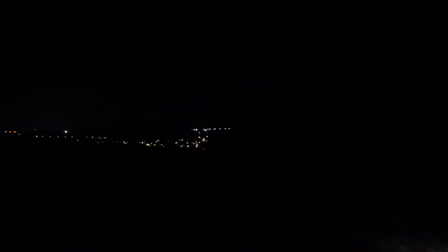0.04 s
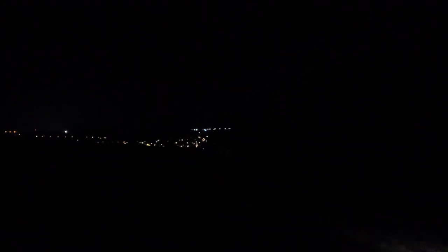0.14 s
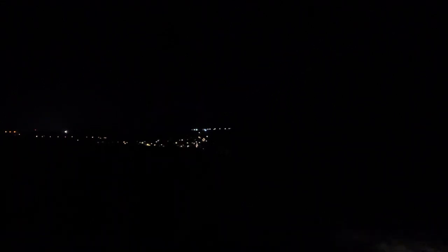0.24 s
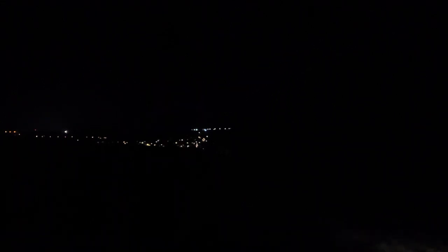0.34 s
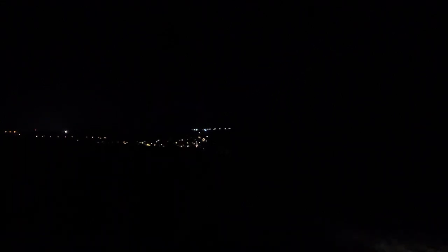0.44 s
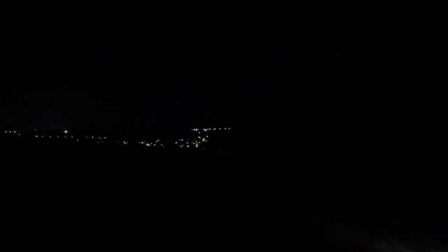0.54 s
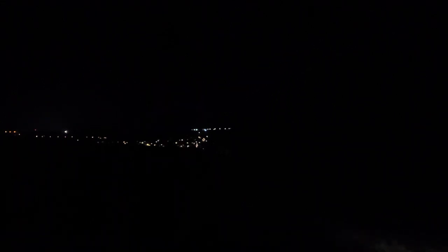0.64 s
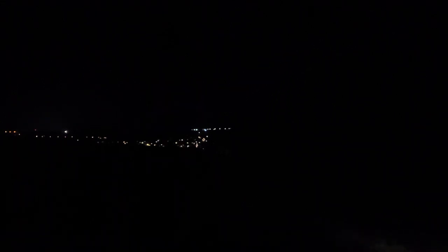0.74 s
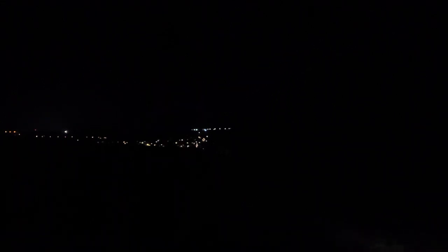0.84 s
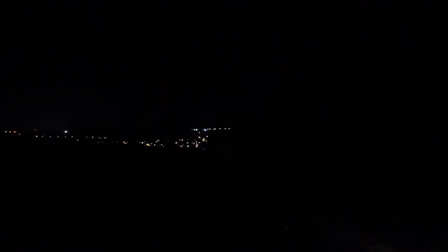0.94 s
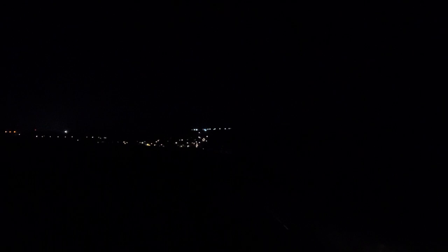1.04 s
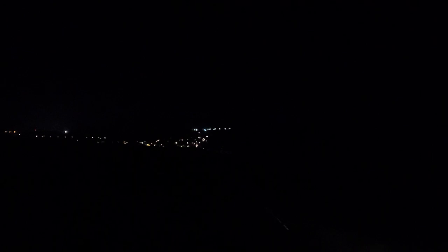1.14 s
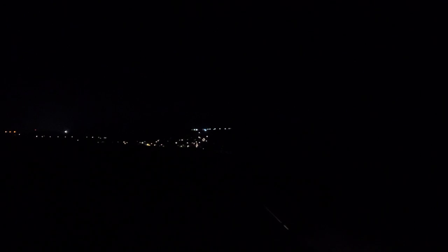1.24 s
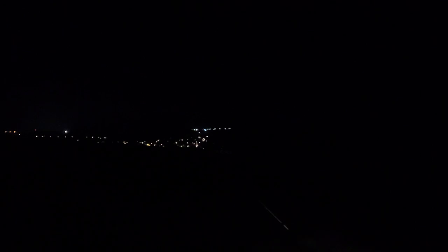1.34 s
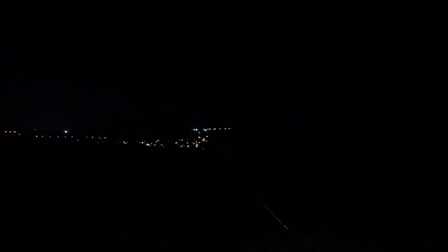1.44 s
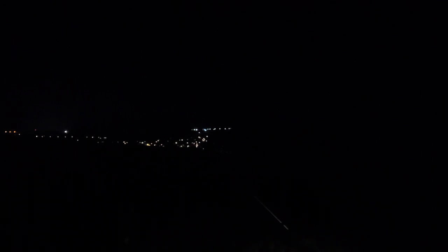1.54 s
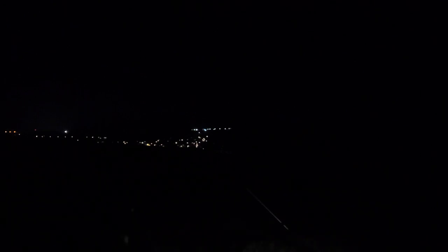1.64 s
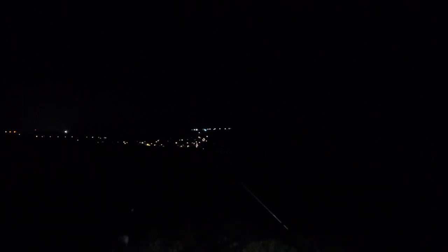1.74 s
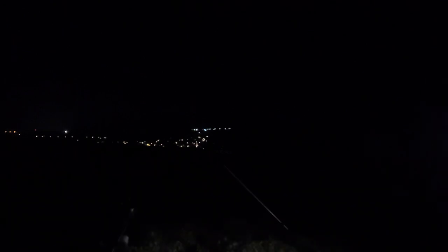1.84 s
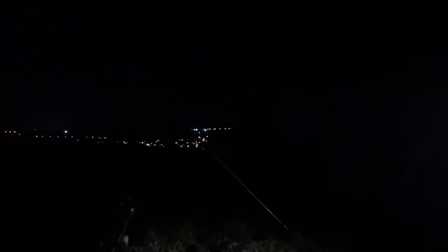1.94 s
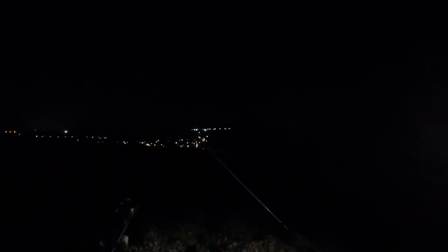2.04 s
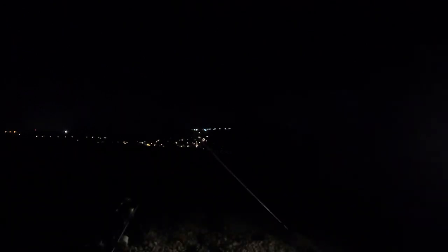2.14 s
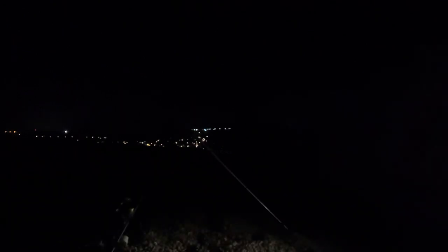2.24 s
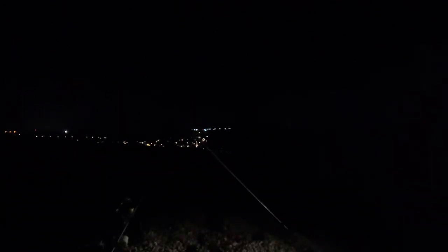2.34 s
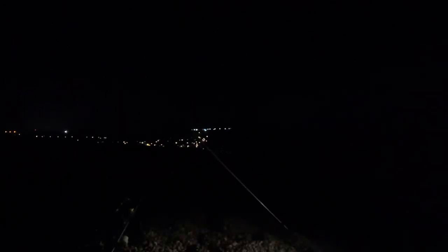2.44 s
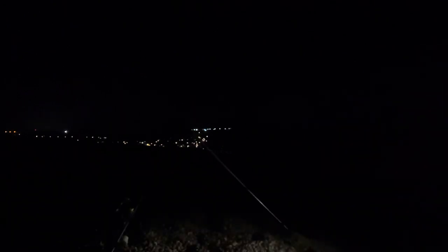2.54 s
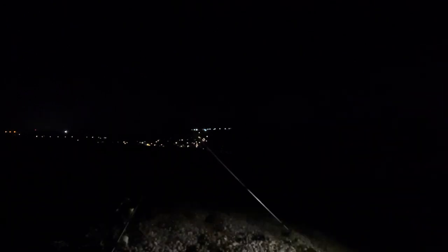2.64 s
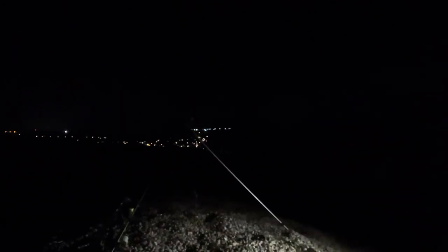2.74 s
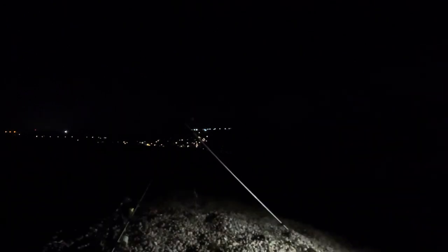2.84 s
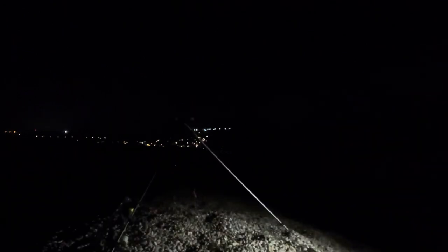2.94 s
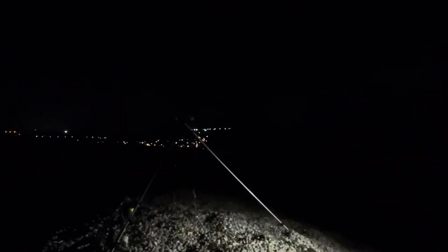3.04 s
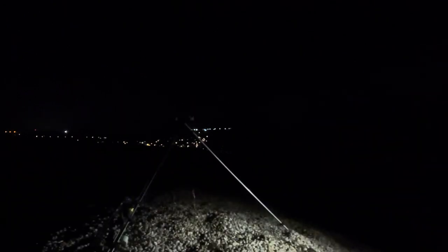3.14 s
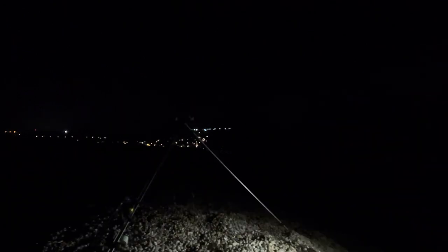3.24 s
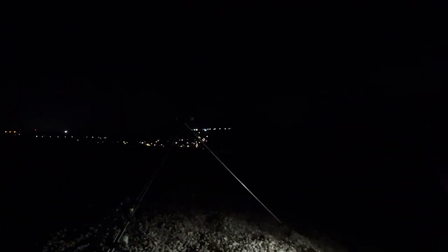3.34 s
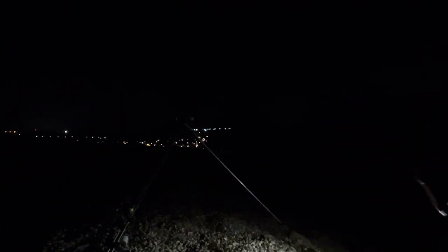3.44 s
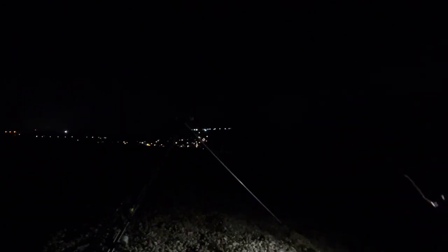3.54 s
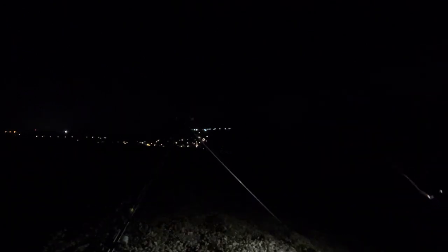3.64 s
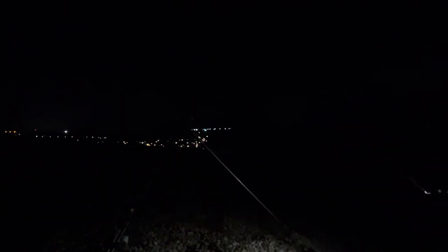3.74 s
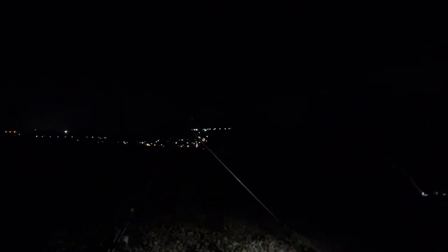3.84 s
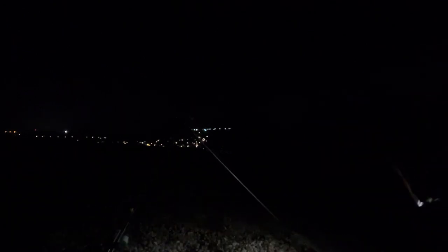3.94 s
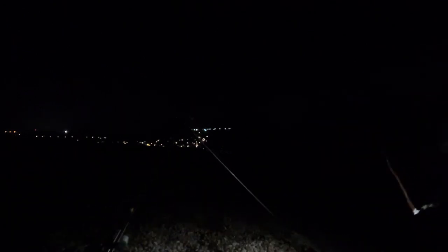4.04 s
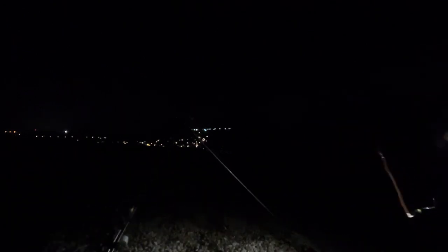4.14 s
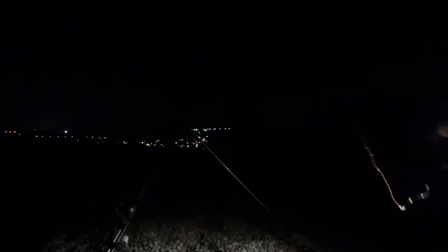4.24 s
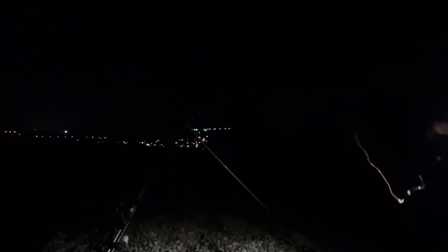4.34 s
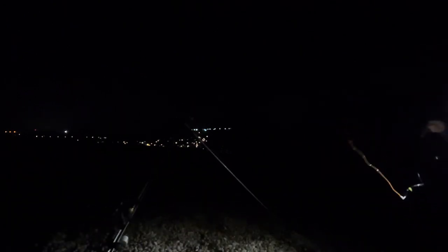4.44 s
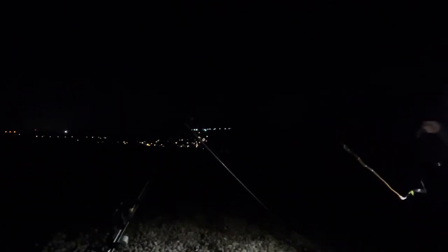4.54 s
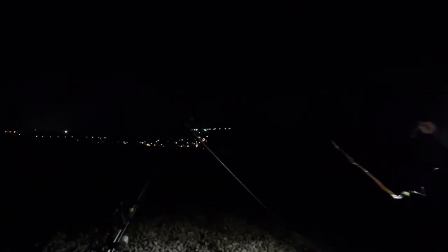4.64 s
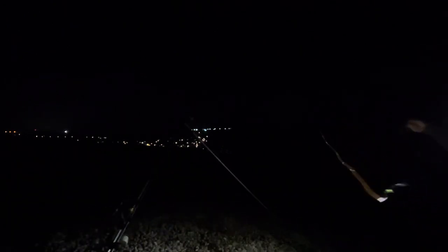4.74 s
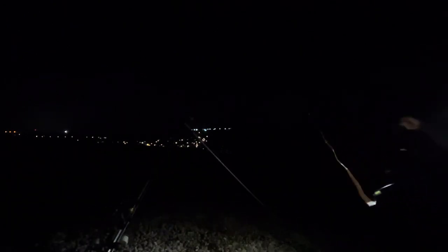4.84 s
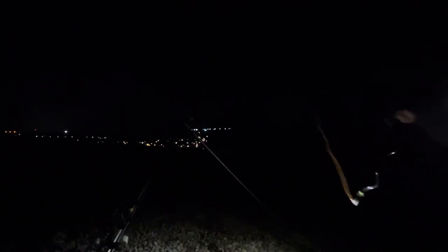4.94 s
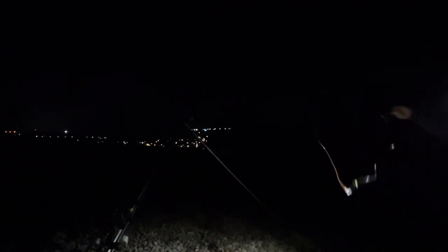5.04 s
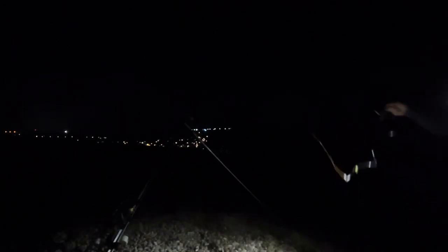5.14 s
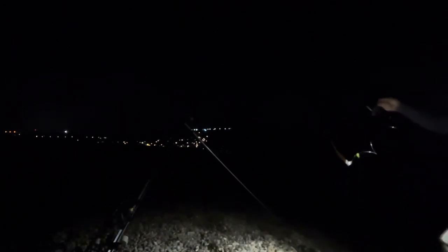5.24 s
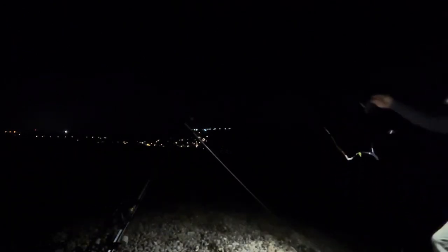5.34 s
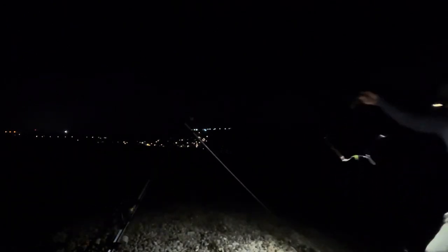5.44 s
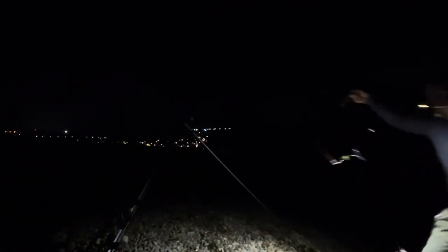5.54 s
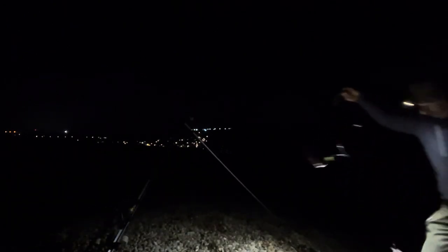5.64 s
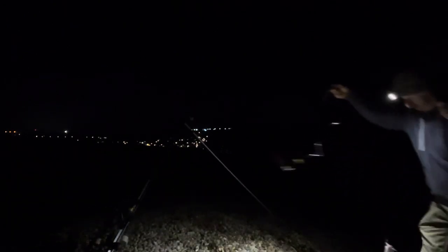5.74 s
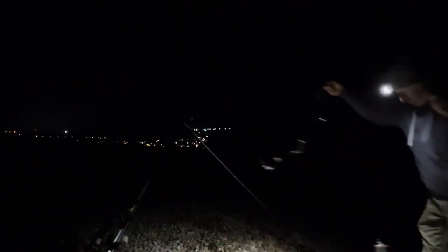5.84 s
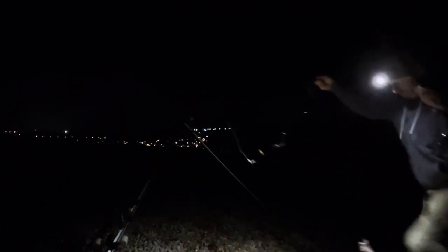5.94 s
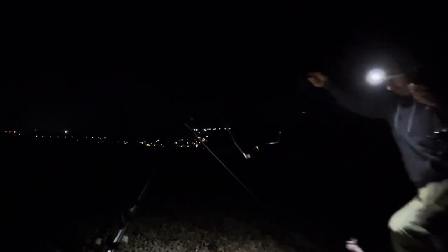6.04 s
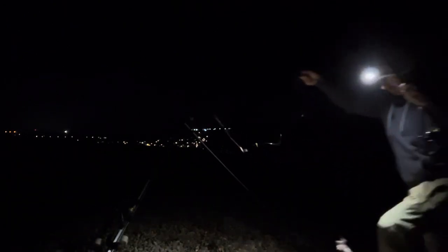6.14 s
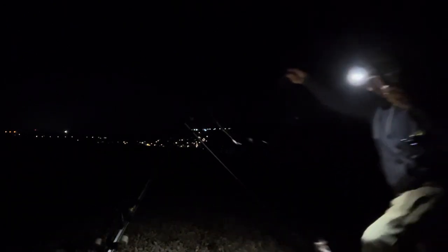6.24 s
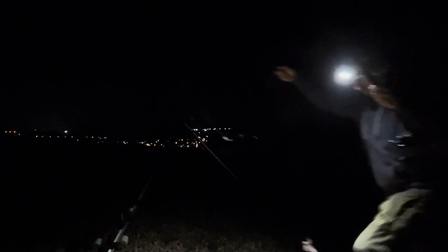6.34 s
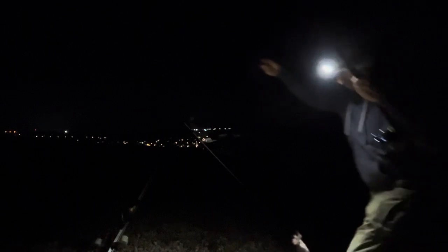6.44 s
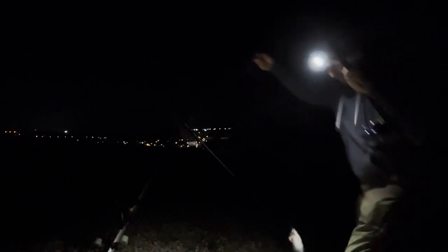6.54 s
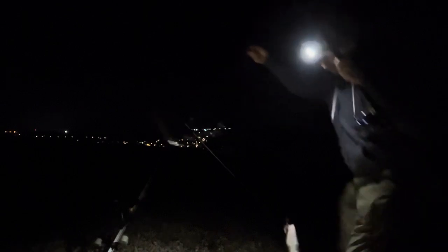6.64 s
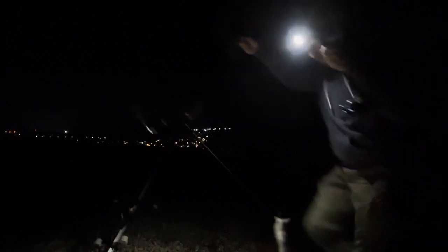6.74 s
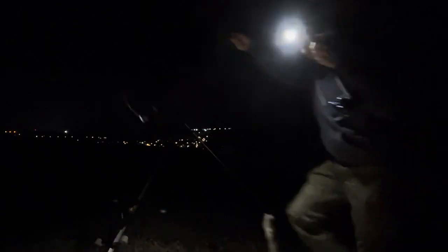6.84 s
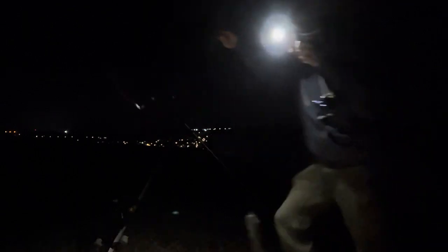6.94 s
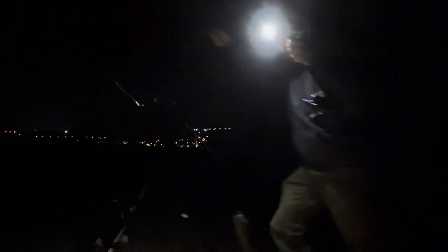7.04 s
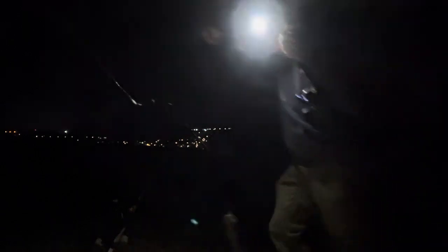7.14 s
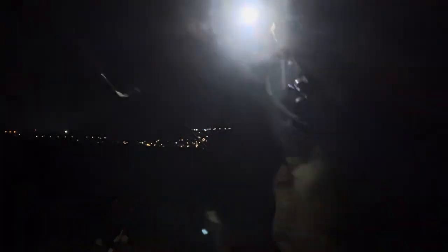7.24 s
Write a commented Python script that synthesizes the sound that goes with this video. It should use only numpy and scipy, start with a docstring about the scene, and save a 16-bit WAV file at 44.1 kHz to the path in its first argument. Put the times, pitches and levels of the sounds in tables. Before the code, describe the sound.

Someone walks over a shingle beach towards a stationary microphone, from the right. Each step is a gritty crunch of many small stones, with a heel bite, rolling weight and dragging scrape, and stray pebbles ticking between. Steps start soft and distant, about one every three quarters of a second, and steadily grow louder, ending with sharp stone cracks close by. The sea is barely audible behind, with a faint low engine hum.

```python
"""A shingle beach, with someone walking up it towards the microphone from the right.
Each step is a grind of thousands of tiny stone contacts in three sizes, its level shaped by heel, sole and drag.
Single stones click as short decaying rings with noise, some squeak as falling chirps, and the boot's
weight thuds as damped low sines. Filtered noise makes a faint wash of sea; a wavering sine is a far engine."""
import sys
import numpy as np
from scipy import signal
from scipy.fft import rfft, irfft, next_fast_len
from scipy.io import wavfile
from scipy.ndimage import uniform_filter1d, map_coordinates

SR = 44100
rng = np.random.default_rng(int(sys.argv[2]) if len(sys.argv) > 2 else 0)


def dump(signal):
    """Clip the signal to [-1, 1] and save it as 16-bit WAV at the path in sys.argv[1]."""
    limited = np.clip(np.atleast_2d(signal).T, -1, 1)
    pcm = np.round(limited * 32767).astype(np.int16)
    wavfile.write(sys.argv[1], SR, pcm)


N = 321209
TIME = np.arange(N) / SR
REFERENCE_DB = -40  # crunch level at which densities and layer levels are set


def gain_of(db):
    """Turns decibels into amplitude."""
    return 10 ** (np.asarray(db) / 20)


def evened(x):
    """Scales a signal to rms 1."""
    return x / np.sqrt(np.mean(x ** 2) + 1e-20)


def follow(rows, column=1):
    """Draws one table column as a curve over every sample."""
    rows = np.asarray(rows)
    return np.interp(TIME, rows[:, 0], rows[:, column])


def add(mix, start_s, sound):
    """Mixes a two-channel sound in at its start time."""
    part = mix[:, max(round(start_s * SR), 0):][:, :sound.shape[1]]
    part += sound[:, :part.shape[1]]


def colour(x, points, size=2048):
    """Minimum-phase filter through (hz, db) points: no pre-ringing, so attacks stay sharp."""
    hz, db = np.transpose(points)
    bins_hz = abs(np.fft.fftfreq(size, 1 / SR))
    curve_db = np.interp(np.log(bins_hz + 1), np.log(hz), db)
    log_gain = np.log(gain_of(curve_db))
    taps = np.fft.ifft(np.exp(np.conj(signal.hilbert(log_gain)))).real[:size // 2]
    return signal.oaconvolve(x, taps[None], axes=1)[:, :x.shape[1]]


def wander(rate_hz, size=N):
    """Smooth random movement of rms 1: white noise rolled off steeply above rate_hz."""
    length = next_fast_len(size)
    hz = np.fft.rfftfreq(length, 1 / SR)
    spectrum = rfft(rng.standard_normal(length)) / (1 + (hz / rate_hz) ** 2) ** 2
    return evened(irfft(spectrum, length)[:size])


# spectrum of the sea's wash: hz, gain_db
SEA_COLOUR = [(20, -37), (45, 7), (70, 4), (100, -8), (250, -15), (600, -18.5), (1500, -12.5),
              (2500, -16.5), (4000, -17.5), (6000, -17), (10000, -41), (16000, -59)]


def sea():
    """Wash of the sea: coloured noise, partly shared by the two channels, swelling slowly."""
    shared, *own = rng.standard_normal((3, N))
    wash = evened(colour(shared + np.array(own), SEA_COLOUR))
    return wash * gain_of(-62.5 + 1.8 * wander(3))


# the far engine's tone: pitch_hz, level_db (rms)
ENGINE_TONE = [(59.2, -59)]


def engine_drone():
    """Far engine: one low tone whose strength and phase waver at random."""
    pitch_hz, level_db = ENGINE_TONE[0]
    waver = 1 + .5 * wander(35) + .5j * wander(34)
    tone = (waver * np.exp(2j * np.pi * pitch_hz * TIME)).real
    return evened(tone) * gain_of(level_db)


STRIKE_S, HEEL_FALL_DB_PER_S = 0.006, 144  # the heel bites, and its burst dies away
ROLL_IN_DB = 11.5  # the sole rolls on from at least this far below full weight; the drag from exactly this
RELEASE_DB_PER_S, LIFT_DB_PER_S = 128, 119.5  # the sole unloads; the drag dies as the boot lifts
SCUFF_DB, SCUFF_SLOPE_DB_PER_S = -18, 132  # brush of the top stones, relative to the heel; both sides of landing


def footfall(t, heel_db, weight_db, on_s, off_s, drag_db, drag_db_per_s, lift_s):
    """Crunch power t seconds after landing: scuff, heel strike, sole rolling on and off, drag and lift."""
    landed = np.maximum(t, 0)
    unloading = np.maximum(t - off_s, 0)
    lifting = np.maximum(t - lift_s, 0)
    scuff = heel_db + SCUFF_DB - SCUFF_SLOPE_DB_PER_S * abs(t)
    heel = heel_db - HEEL_FALL_DB_PER_S * landed
    roll_in_db = max(ROLL_IN_DB, weight_db - heel_db)
    sole = weight_db - roll_in_db * np.maximum(1 - landed / on_s, 0) - RELEASE_DB_PER_S * unloading
    drag = drag_db - ROLL_IN_DB * np.maximum(1 - landed / off_s, 0)
    drag = drag - drag_db_per_s * unloading - LIFT_DB_PER_S * lifting
    bite = np.minimum(landed / STRIKE_S, 1)
    return gain_of(scuff) ** 2 + bite ** 2 * (gain_of([heel, sole, drag]) ** 2).sum(0)


SETTLE_FAR_DB, SETTLE_GROWTH_DB_PER_S = -72, 2.56  # stones keep settling, louder as the walker nears
# level at the reference crunch, and dB per dB of crunch
STONES_DB, STONES_SHARE = -45, 0.76
BED_DB, BED_SHARE = -50, 0.55
STONES_LAG_S = 0.009  # larger stones take a moment to get moving
# footfalls and light shifts of weight: start_s, heel_db, weight_db, then after the start: weight_on_s,
# weight_off_s; drag_db, drag_fade_db_per_s, lift_s (after start), extra_stones_db, extra_bed_db
STEPS = [(0.0, -47.5, -45.5, 0.12, 0.18, -65, 16, 0.52, 3, 6),
         (0.673, -39.5, -41, 0.085, 0.23, -79, 30, .42, 2, 3),
         (1.219, -65, -66, 0.14, 0.26, -54.5, 20, 0.28, 3, 3),
         (1.453, -38.5, -37.5, 0.035, 0.16, -45.5, 41, 0.44, 0, -0.5),
         (2.193, -34, -30.5, 0.092, 0.22, -38, 51, 0.36, -1.5, -1),
         (2.705, -54, -54.5, .04, 0.058, -64, 20, .12, 0, -5.5),
         (2.865, -31.5, -31.5, 0.12, 0.18, -39.5, 1.5, 0.79, 0.5, -1.5),
         (3.711, -38.5, -29, 0.061, 0.11, -34.5, 19, 0.69, 0, 4.5),
         (4.48, -37.5, -32, 0.11, 0.3, -38.5, 23.5, 0.71, 0, -0.5),
         (5.385, -29.5, -26.5, 0.12, .27, -31.5, 37.5, 0.73, 1, -2),
         (6.195, -33, -26, 0.083, 0.16, -31, 8, 0.65, 1, -1.5),
         (6.904, -20, -26, 0.02, 0.07, -26.5, 18, .2, -1.5, -2),
         (7.093, -24.5, -25, 0.019, 0.11, -33, 20, .3, 1.5, -5.5)]


def walk(hop=16):
    """Levels in dB of pebbles, larger stones and deep bed; heavier layers follow the crunch less than fully."""
    t = TIME[::hop]
    powers = np.array([footfall(t - start_s, *shape) for start_s, *shape, _, _ in STEPS])
    settling = gain_of(SETTLE_FAR_DB + SETTLE_GROWTH_DB_PER_S * t) ** 2
    total = settling + powers.sum(0)
    crunch_db = 10 * np.log10(total)
    # each step's extras count by its share of the power
    extra_stones, extra_bed = np.array(STEPS)[:, -2:].T @ powers / total
    effort = crunch_db - REFERENCE_DB
    keep = np.exp(-hop / (STONES_LAG_S * SR))
    lagging = signal.lfilter([1 - keep], [1, -keep], effort - effort[0]) + effort[0]
    stones_db = STONES_DB + STONES_SHARE * lagging + extra_stones
    bed_db = BED_DB + BED_SHARE * effort + extra_bed
    return [np.interp(TIME, t, db) for db in (crunch_db, stones_db, bed_db)]


def contacts(low_hz, high_hz, ring_s, crack, spread_ms, count=1200, size=256):
    """Bank of stone knocks (2, count, size): a crack, three short modes and chatter, each at its own place."""
    t = np.arange(size) / SR
    pitch = low_hz * (high_hz / low_hz) ** rng.random((3, count, 1))
    ring = ring_s * np.exp(rng.standard_normal((3, count, 1)) / 2)
    knock = (np.sin(2 * np.pi * pitch * t) * np.exp(-t / ring)).sum(0)
    knock += crack * (t == 0)
    knock += 0.09 * crack * rng.standard_normal((count, size)) * np.exp(-t / 0.003)
    # place comes from a small time difference between the channels
    offset_s = spread_ms * rng.standard_normal((count, 1)) / 1000
    delay_s = 12 / SR + np.array([offset_s, -offset_s]) / 2
    turn = np.exp(-2j * np.pi * np.fft.rfftfreq(size, 1 / SR) * delay_s)
    return irfft(rfft(knock) * turn, size)


def grind(level_db, knocks, spectrum, per_s, crowding, scatter_db, clump_db, hold_s):
    """A shower of contacts: the harder the boot presses, the more stones slip, in small avalanches."""
    rate = per_s * gain_of(crowding * (level_db - REFERENCE_DB))
    at = np.flatnonzero(rng.random(N) < np.minimum(rate / SR, 1 / 4))
    which = rng.integers(0, knocks.shape[1], len(at))
    size = gain_of(scatter_db * np.minimum(rng.exponential(1, len(at)), 4))
    size = size * rng.choice([-1, 1], len(at))
    places = (at[:, None] + np.arange(knocks.shape[2])).ravel()
    shower = np.array([np.bincount(places, (side[which] * size[:, None]).ravel(), N)[:N] for side in knocks])
    shower = colour(shower, spectrum) * gain_of(clump_db * wander(88))
    # even out the level over hold_s, then impose the wanted one
    power = abs(uniform_filter1d((shower ** 2).mean(0), int(hold_s * SR) + 1))
    return shower / np.sqrt(power + power.mean() / 1000) * gain_of(level_db)


SLIP_DB, SLIP_HZ = 2, 24.7  # the footing gives in uneven slips
# spectra of small pebbles, larger stones and the deep bed: hz, gain_db
PEBBLE_COLOUR = [(800, -86), (1500, -22.5), (2700, -8.5), (3400, -5), (4300, 1), (5400, 5), (6400, 2.5),
                 (7300, -5), (8800, -3), (10000, -5.5), (12000, -15), (13200, -67), (15800, -64)]
STONE_COLOUR = [(100, -78), (250, -15.5), (550, -5.5), (1050, -6.5), (1550, -0.5), (2100, 3), (2700, 3.5),
                (3400, 0.5), (5000, -33), (10000, -88)]
BED_COLOUR = [(35, -32), (75, -2), (130, -0.5), (220, 1.5), (330, 1.5), (450, -2), (600, -4.5),
              (1100, -11.5), (4000, -103)]


def shingle(crunch_db, stones_db, bed_db):
    """Small pebbles crunch on top, larger stones knock below, and the deep bed gives way."""
    slipping_db = crunch_db + SLIP_DB * wander(SLIP_HZ)
    small = grind(slipping_db, contacts(2516, 9544, ring_s=0.0022, crack=14.8, spread_ms=0.035), PEBBLE_COLOUR,
                  per_s=1700, crowding=.85, scatter_db=1.0, clump_db=-0.45, hold_s=0.03)
    large = grind(stones_db, contacts(516, 4890, ring_s=0.00088, crack=11.2, spread_ms=0.02), STONE_COLOUR,
                  per_s=4000, crowding=.3, scatter_db=1.0, clump_db=0.78, hold_s=.1)
    deep = grind(bed_db, contacts(204, 1260, ring_s=0.00036, crack=3.3, spread_ms=0.27), BED_COLOUR,
                 per_s=1500, crowding=0.22, scatter_db=0.0, clump_db=-2.4, hold_s=0.036)
    return small + large + deep


LOOSE_PER_S, LOOSE_LOW_HZ, LOOSE_HIGH_HZ = 20, 4700, 6800  # stray pebbles off the boot, and their ring range
# level at the reference crunch, dB per dB of crunch, and scatter either way
LOOSE_DB, LOOSE_SHARE, LOOSE_SCATTER_DB = -43.5, .55, 6


def loose_stones(crunch_db, count=400):
    """Stray pebbles tumble at random, harder while the boot works: rows of start_s, level_db, ring_hz."""
    wait, size, pitch = rng.random((count, 3)).T
    times = np.cumsum(-np.log(1 - wait)) / LOOSE_PER_S
    effort = np.interp(times, TIME, crunch_db) - REFERENCE_DB
    level_db = LOOSE_DB + LOOSE_SHARE * effort + LOOSE_SCATTER_DB * (2 * size - 1)
    ring_hz = LOOSE_LOW_HZ + (LOOSE_HIGH_HZ - LOOSE_LOW_HZ) * pitch
    return np.transpose([times, level_db, ring_hz])[times < TIME[-1]]


CLICK_COLOUR = [(400, -26), (2500, -1), (4300, 5.0), (6500, 4.5), (9000, 4.5),
                (12000, -12.5), (13400, -17), (15500, -40)]  # hz, gain_db
# single stones that snap together: start_s, level_db (rms of the first 3 ms), ring_hz
STONE_SNAPS = [(0.261, -44, 6000), (0.3238, -48, 5750), (0.676, -32, 4360), (0.6916, -33.5, 5660),
               (1.1891, -50, 4900), (1.3564, -47, 5870), (1.4575, -48, 5140), (1.6466, -30, 5170),
               (1.7645, -40, 5140), (1.9345, -45, 6400), (1.945, -40, 6800), (2.2163, -33, 5000),
               (2.2267, -27, 6070), (2.3797, -35, 5000), (2.6223, -42, 5550), (2.665, -43.5, 5500),
               (2.8722, -35, 4900), (2.8809, -24.5, 5330), (3.0372, -25, 5500), (3.5769, -32, 4840),
               (4.397, -37, 6900), (4.489, -28, 5300), (4.932, -31.5, 6800), (5.211, -33.5, 5840),
               (5.2544, -31.5, 6700), (5.2757, -36, 6060), (5.342, -37.5, 6000), (5.3892, -45, 5800),
               (5.4363, -26, 5600), (5.4963, -34, 4760), (6.069, -36, 5440), (6.1132, -43, 6270),
               (6.1353, -31.5, 5300), (6.206, -45, 5140), (6.5007, -25, 6640), (6.9108, -20.5, 5970),
               (6.916, -15.5, 5140), (6.971, -23, 6060), (7.0866, -24, 5540)]


def clicks(rows):
    """A hard contact briefly rings a stone and rattles its neighbours; a harder blow rattles longer."""
    out, t = np.zeros((2, N)), np.arange(1024) / SR
    for start_s, level_db, ring_hz in rows:
        ring = .6 * np.sin(2 * np.pi * ring_hz * t) * np.exp(-t / .0005)
        rattle_s = .0008 * gain_of(.6 * max(level_db + 33, 0))
        fading = np.exp(-t / rattle_s) + 0.023 * np.exp(-t / 0.0015)
        rattle = rng.standard_normal(len(t)) * fading
        click = colour((ring + rattle)[None], CLICK_COLOUR)
        onset_rms = np.sqrt(np.mean(click[0, :round(.003 * SR)] ** 2))
        add(out, start_s, np.vstack([click, click]) / onset_rms * gain_of(level_db))
    return out


# stones skidding over each other: start_s, peak_db, pitch_hz (near the start of the fall)
STONE_SQUEAKS = [(0.94, -32, 9000), (2.4408, -38, 11150), (2.4535, -27.5, 10200)]


def squeaks():
    """Stick and slip between two smooth stones: a short, jittery falling whistle."""
    out, t = np.zeros((2, N)), np.arange(1024) / SR
    for start_s, peak_db, pitch_hz in STONE_SQUEAKS:
        pitch = pitch_hz * (1.01 - 2.5 * t + 0.025 * rng.standard_normal(len(t)))
        chirp = np.sin(2 * np.pi * np.cumsum(pitch) / SR) * t * np.exp(-t / 0.0047)
        add(out, start_s, np.array([chirp, chirp]) / abs(chirp).max() * gain_of(peak_db))
    return out


# the boot's weight landing in the bed: start_s, peak_db, decay_s, final_hz (centre of the wavering pitch)
BOOT_THUDS = [(2.864, -44, 0.035, 119.4), (3.723, -36, 0.06, 120), (3.765, -34.5, 0.046, 80.4),
              (3.835, -36.5, 0.071, 91.3), (5.377, -35.5, 0.011, 138), (6.2, -34.5, 0.013, 120),
              (6.914, -30, 0.02, 152), (6.943, -28, 0.006, 80), (7.117, -31.5, 0.0084, 299)]


def thuds():
    """The boot's weight lands: a damped, uneven push that falls in pitch as the bed packs."""
    out, t = np.zeros((2, N)), np.arange(8192) / SR
    for start_s, peak_db, decay_s, final_hz in BOOT_THUDS:
        falling_hz = final_hz + 200 * np.exp(-t / 0.009)
        hz = falling_hz * np.exp(0.406 * wander(104, size=len(t)))
        swell = (1 - np.exp(-t / 0.0031)) * np.exp(-t / decay_s)
        push = np.sin(2 * np.pi * np.cumsum(hz) / SR) * swell
        add(out, start_s, np.array([push, push]) / abs(push).max() * gain_of(peak_db))
    return out


# the walker's path: start_s, left_lag_ms (above the bass), nearness (no unit, 0 far and 1 near)
PATH = [(0, 0.39, 0.2), (1.6, .37, 0), (4.1, 0.34, 0.45), (4.7, 0.31, 0.7), (5.5, 0.27, 0.79),
        (6.85, 0.21, 1), (6.91, 0.13, 1.07), (7.28, 0.14, 0.6)]
# tint of the steps at nearness 1: hz, gain_db
NEAR_TINT = [(300, -0.5), (700, 0), (1050, 6), (1500, 6), (1950, 2), (2600, -11.5), (3500, 5.5),
             (5500, -3.5), (8000, 1), (12000, -0.5)]


def approach(x):
    """The colour of the steps shifts as the path to the microphone shortens and steepens."""
    nearness = follow(PATH, column=2)
    return x + nearness * (colour(x, NEAR_TINT) - x)


def beach(x, count=60):
    """The stony ground scatters a short, weak tail, a new one for each place along the way."""
    t, out = np.arange(3000) / SR, x.copy()
    for stretch in np.array_split(np.arange(N), count):
        # falls 60 dB in 37 ms, after a 1 ms gap
        tail = rng.standard_normal((2, len(t))) * gain_of(-60 * t / 0.037) * (t > .001)
        scattered = signal.oaconvolve(x[:, stretch], tail / np.linalg.norm(tail[0]), axes=1)
        add(out, TIME[stretch[0]], gain_of(-9.5) * scattered)
    return out


# shading between the channels: hz, left_minus_right_db
LEFT_SHADE = [(100, -1), (400, -2.5), (950, -6), (1600, 0.5), (2800, 0.1), (3900, -0.9), (5600, -5.5),
              (7500, -2), (9500, 0.5)]


def from_the_right(x):
    """The left channel hears the steps later and shaded; the lag follows the path and is wider in the bass."""
    lag = follow(PATH) * SR / 1000  # in samples
    bass = signal.sosfiltfilt(signal.butter(2, 1100, fs=SR, output="sos"), x[0])
    bands = [(bass, 1.59 * lag), (x[0] - bass, lag)]
    left = sum(map_coordinates(band, [np.arange(N) - delay], order=3) for band, delay in bands)
    size = next_fast_len(N)
    shade_db = np.interp(np.fft.rfftfreq(size, 1 / SR), *np.transpose(LEFT_SHADE))
    return irfft(rfft([left, x[1]], size) * gain_of([shade_db / 2, -shade_db / 2]), size)[:, :N]


def scene():
    """All that the boots stir up, placed on the beach, over the sea and the far engine."""
    crunch_db, stones_db, bed_db = walk()
    steps = approach(shingle(crunch_db, stones_db, bed_db))
    snaps = clicks(STONE_SNAPS) + clicks(loose_stones(crunch_db))
    stirred = steps + snaps + squeaks() + thuds()
    return from_the_right(beach(stirred)) + sea() + engine_drone()


def record(dry):
    """The microphone's low cut at 38 Hz, then the band limit at 15.8 kHz."""
    cut = signal.sosfilt(signal.butter(4, 38, "high", fs=SR, output="sos"), dry)
    band_limit = signal.firwin(511, 15800, window=("kaiser", 9), fs=SR)
    return signal.oaconvolve(cut, band_limit[None], "same")


dry = scene()
out = record(dry)
dump(out)
```